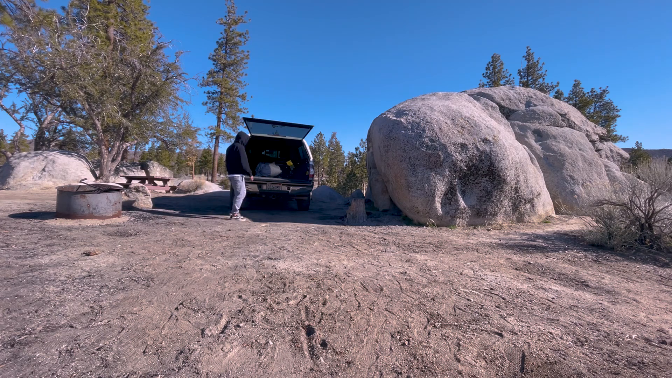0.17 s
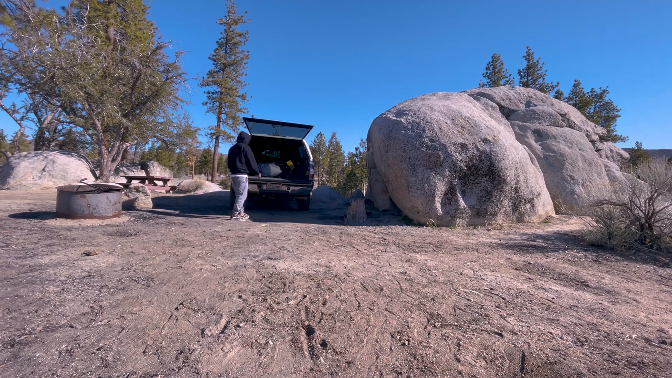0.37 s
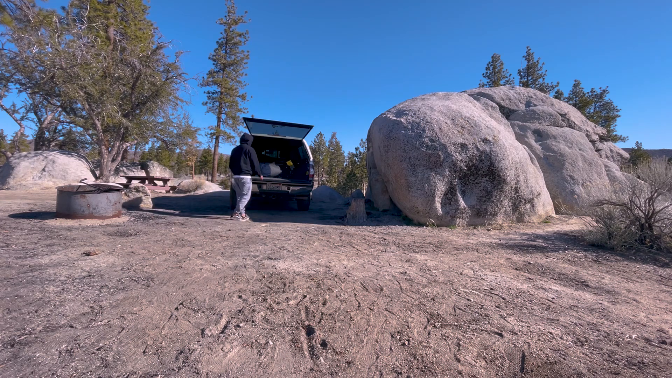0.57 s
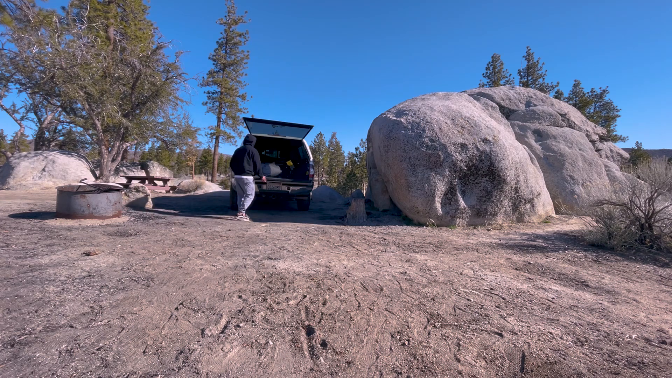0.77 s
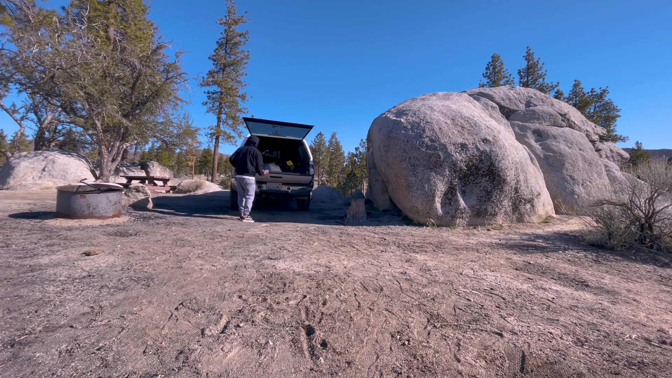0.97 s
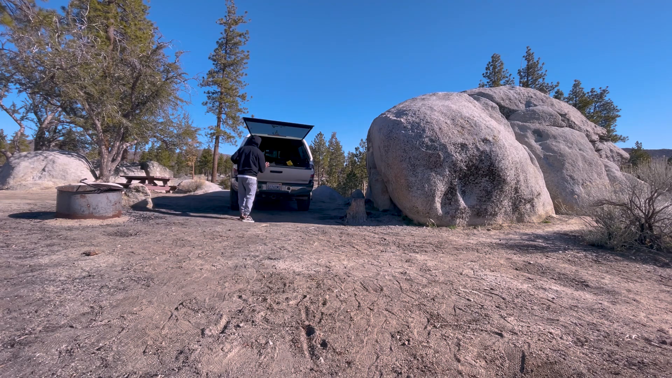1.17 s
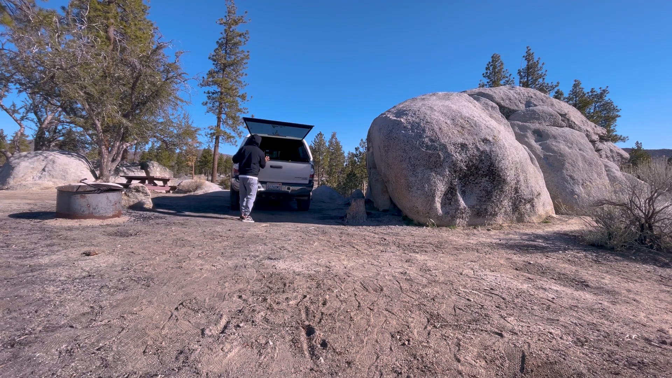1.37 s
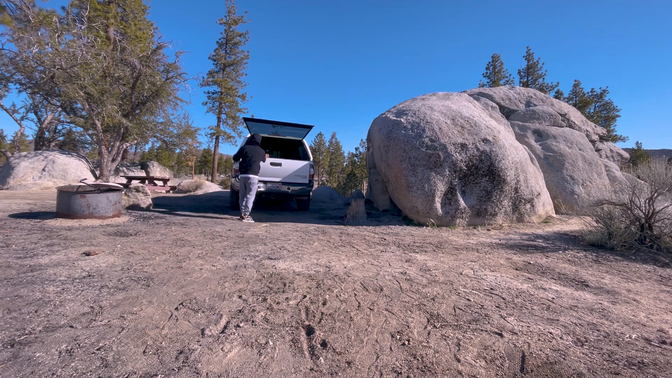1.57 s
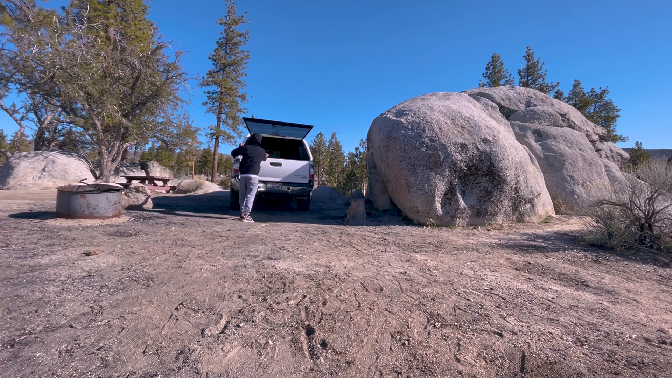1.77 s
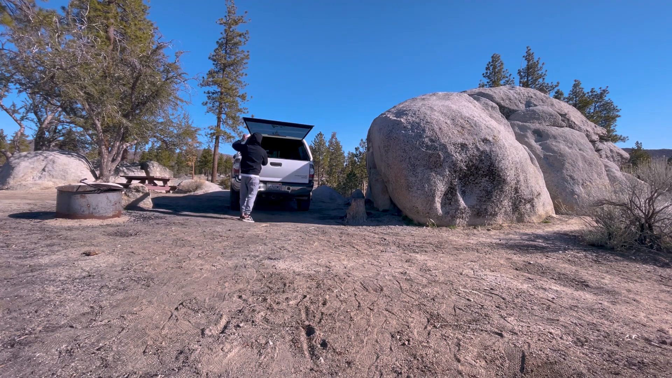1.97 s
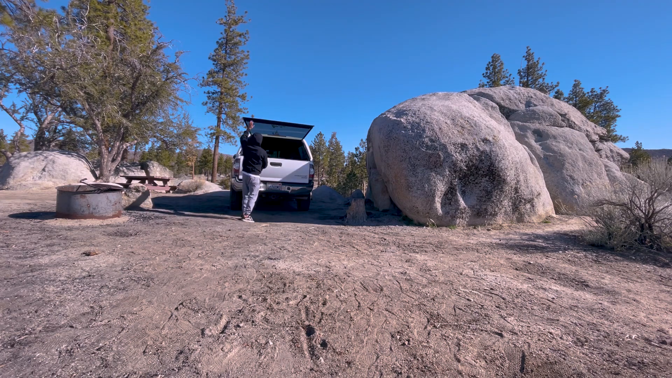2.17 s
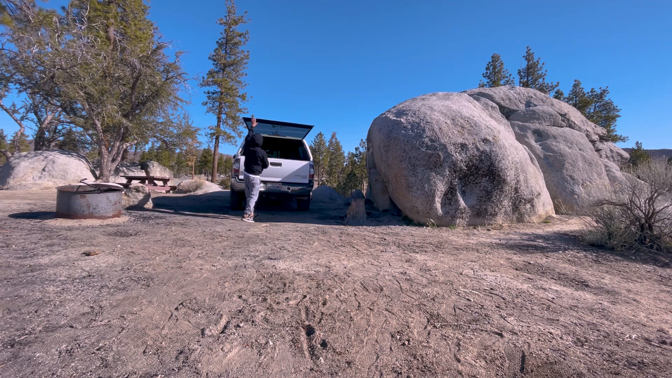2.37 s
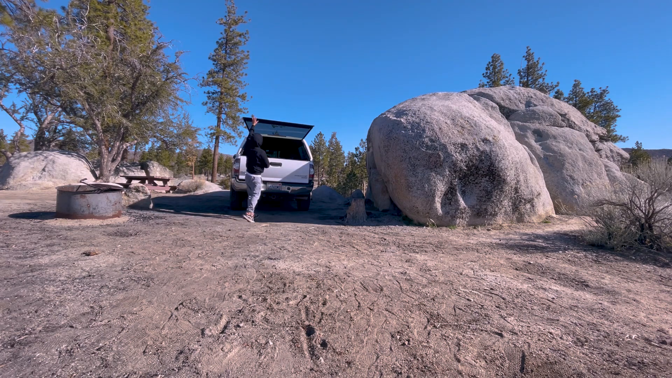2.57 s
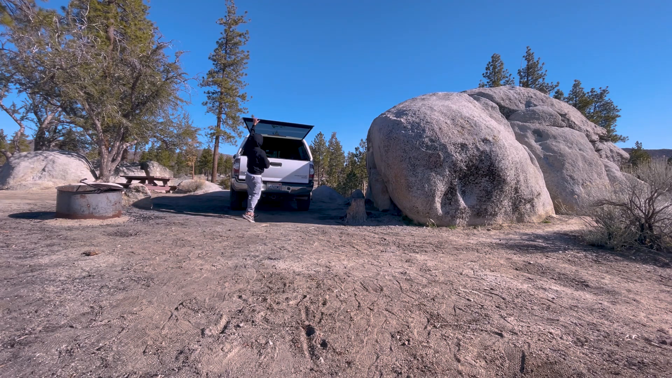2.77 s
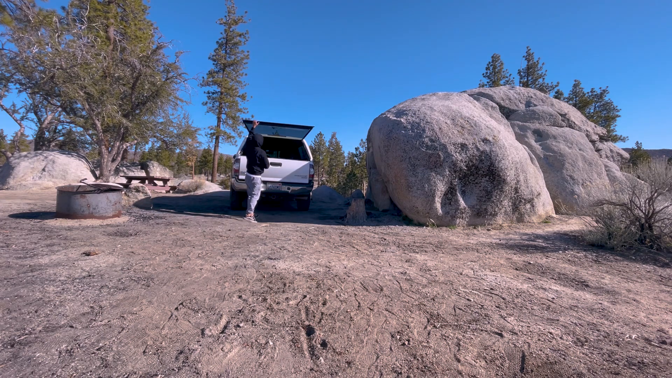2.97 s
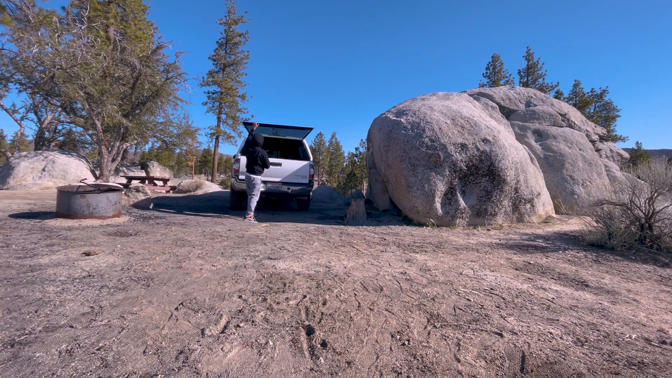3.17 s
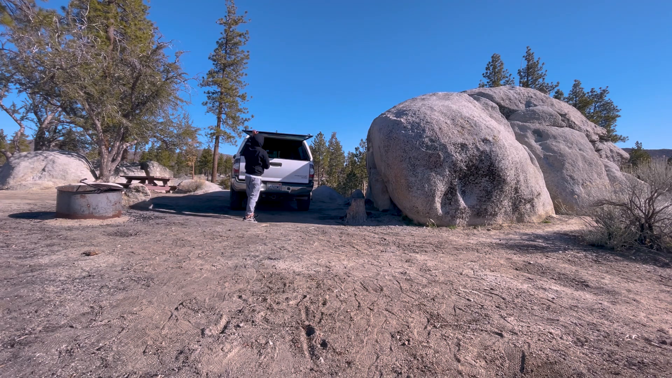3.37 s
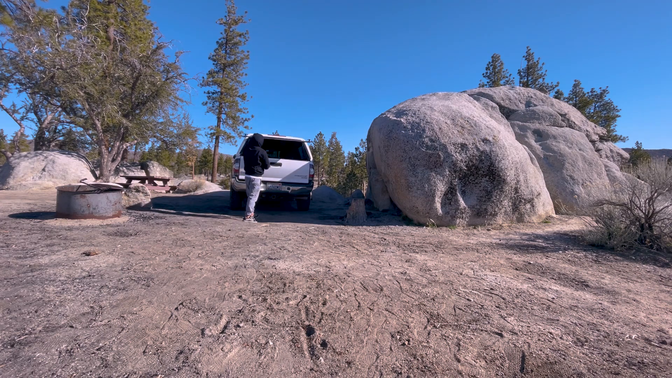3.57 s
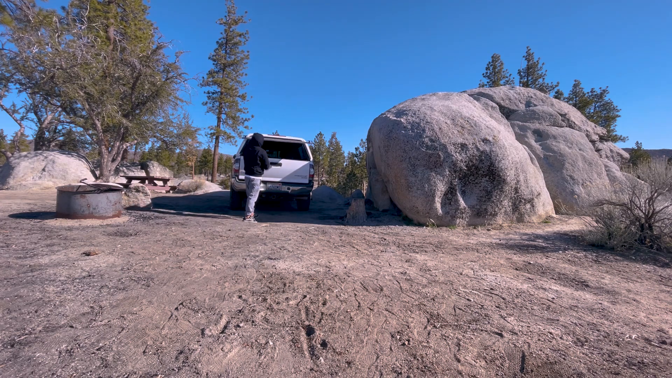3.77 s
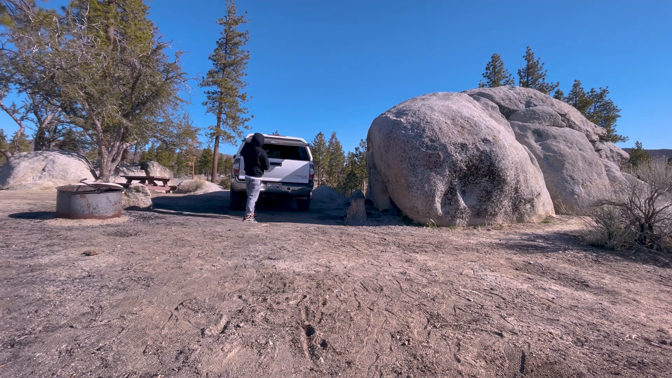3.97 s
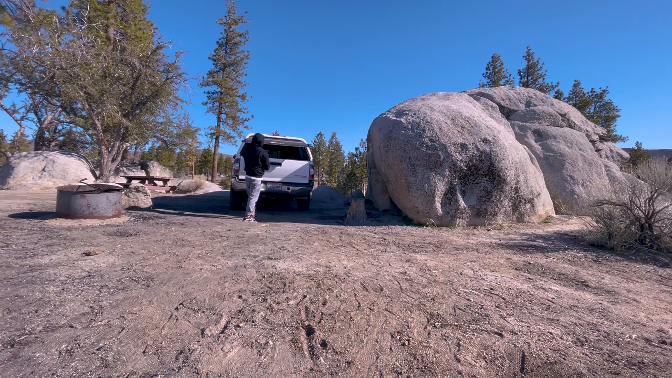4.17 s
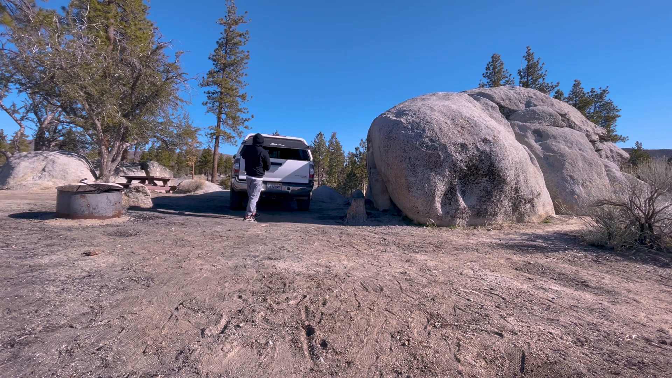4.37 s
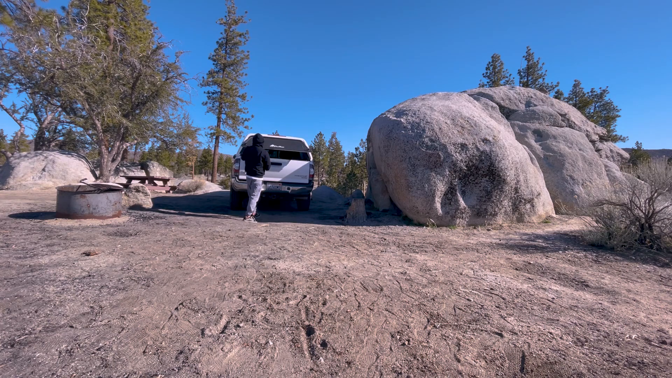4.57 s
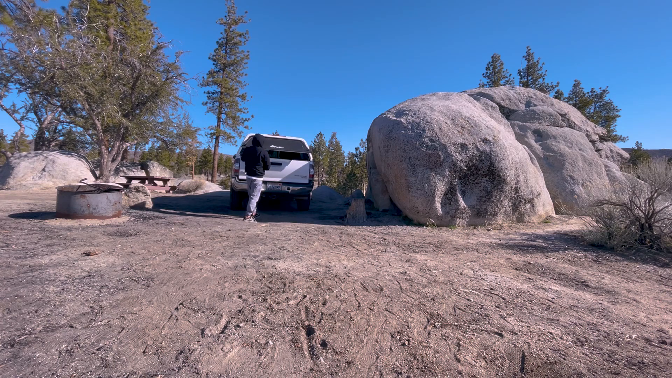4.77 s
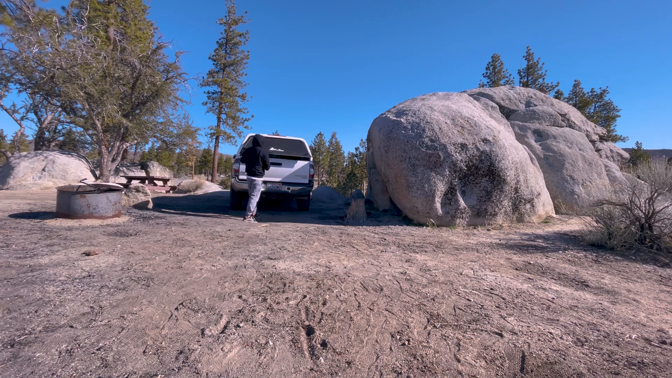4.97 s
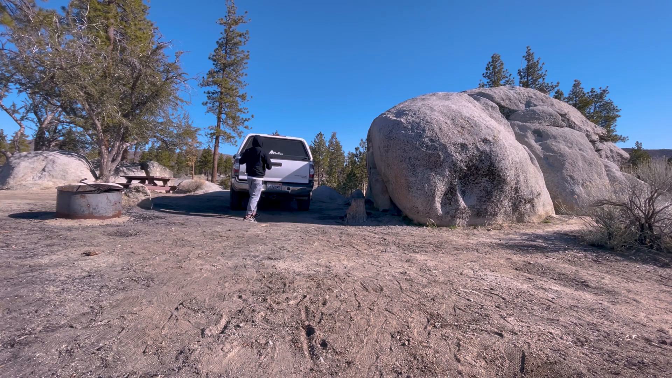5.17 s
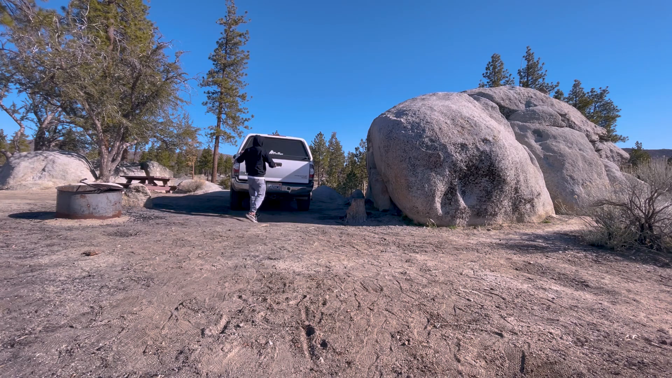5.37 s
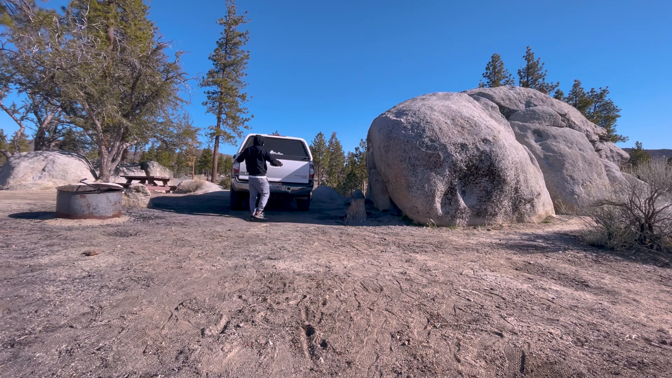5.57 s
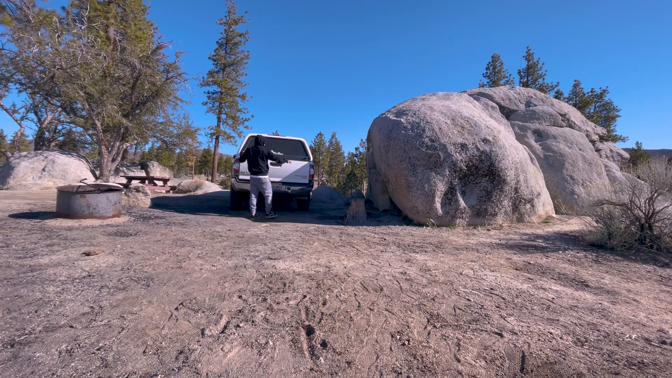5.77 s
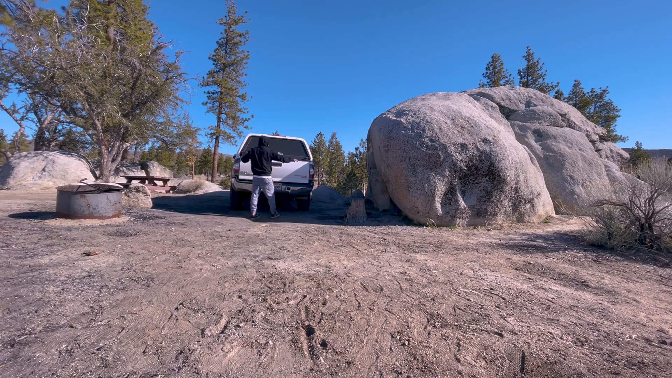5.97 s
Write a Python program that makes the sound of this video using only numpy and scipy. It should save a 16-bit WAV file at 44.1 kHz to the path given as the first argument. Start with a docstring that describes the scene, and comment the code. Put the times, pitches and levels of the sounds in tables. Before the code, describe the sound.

A quiet open campsite heard from a fixed, distant stereo microphone. Soft low outdoor air with faint hiss lies under a far engine's low, steady drone, gently wavering and sagging slightly in pitch throughout. Light sheet-metal knocks come at about 0.75 to 1.05 seconds as a truck's tailgate is lifted, the strongest near 0.9. At 1.6 a tight cluster of hard clanks latches it: a rattling metallic thunk with a short low body boom. From 2.3 to 3 there are only barely audible touches, dull low bumps and a tiny raspy bird chip at 2.85. The engine's dull rush swells near 3.8 and 4.6; very faint distant bird chatter begins around 4, with another chip at 4.57. At 5.1 the rear hatch slams, loudest of all: a sharp crack, hollow deep boom and brief scattered echoes, then a second latch snap at 5.2 and small settling ticks. The drone continues to 6.

```python
"""A pickup's tailgate, some way off at an open campsite, is lifted, rattles and latches with a thunk; then the
glass hatch of its shell is slammed and the closed load bed booms. Each blow is noise cracks, a dying wash and
sheet-metal modes over slow body modes, and a burst of noise echoes scatters it off boulders and trees.
A distant engine of sine overtones drones throughout with dull low noise, over soft outdoor air.
A small bird chips twice as rasping sine arches, and another chatters far off in bursts of noise."""
import sys
import numpy as np
from scipy import signal
from scipy.fft import rfft, irfft, next_fast_len
from scipy.io import wavfile
from scipy.ndimage import map_coordinates

SR = 44100
rng = np.random.default_rng(int(sys.argv[2]) if len(sys.argv) > 2 else 0)


def unload_audio(sound):
    """Save the sound as a 16-bit wav file, at the path given as the first command line argument."""
    columns = np.transpose(np.atleast_2d(sound))
    # keep every value between -1 and 1, then stretch to whole-number steps
    steps = np.round(np.clip(columns, -1, 1) * 32767)
    wavfile.write(sys.argv[1], SR, steps.astype(np.int16))


N = 265570
RING_SIZE = 2 * SR // 5  # samples in one blow's ring or echo tail
FAINTEST_DB = -68  # rebounds and grazes at or below this level are left out
EARS = np.array([[.5], [-.5]])  # left and right each take half of a difference


def amp(db):
    """Decibels to gain."""
    return 10 ** (np.asarray(db) / 20)


def unit(x):
    """Scale to rms 1."""
    return x / np.sqrt(np.mean(x ** 2) + 1e-20)


def along(points, hz):
    """Read (frequency, value) points on a log frequency axis."""
    f, v = np.transpose(points)
    return np.interp(np.log(hz + 1), np.log(f), v)


def wobble(rate, size=N):
    """A smooth random curve with rate knots a second."""
    knots = rng.standard_normal(int(size * rate / SR) + 4)
    return map_coordinates(knots, [np.arange(size) * rate / SR])


def filtered(x, response):
    """Shape x by a response given as a function of frequency."""
    n = x.shape[-1]
    padded = 2 * next_fast_len(n // 2 + SR // 20, real=True)
    spectrum = rfft(x, padded) * response(np.fft.rfftfreq(padded, 1 / SR))
    return irfft(spectrum, padded)[..., :n]


def causal(db):
    """Minimum-phase response of this shape and unit power, so a blow does not sound before its contact."""
    cepstrum = irfft(np.log(unit(amp(db)) + 1e-6))
    half = len(cepstrum) // 2
    cepstrum[1:half] *= 2
    cepstrum[half + 1:] = 0
    return np.exp(rfft(cepstrum))


def diffuse(n):
    """White stereo noise, more alike in the bass than in the treble."""
    # left-right likeness of diffuse sound: (frequency [Hz], correlation [0-1])
    likeness = [(60, 0.4), (130, 0.82), (290, 0.55), (640, 0.11), (1400, .2), (8000, 0.08)]

    def mid_side(hz):
        turn = np.arccos(np.clip(along(likeness, hz), -1, 1)) / 2
        return np.array([np.cos(turn), np.sin(turn)])

    mid, side = filtered(rng.standard_normal((2, n)), mid_side)
    return np.array([mid + side, mid - side])


def dying(length):
    """Diffuse noise in which each frequency dies at its own speed, as in shaken panels."""
    # decay of the panel wash, before the length factor: (frequency [Hz], t60 [s])
    wash_t60s = [(150, 0.74), (400, 0.29), (1200, 0.34), (3000, 0.22), (7000, .23), (14000, 0.12)]
    hz, t, cells = signal.stft(diffuse(RING_SIZE), SR, nperseg=256)
    t60 = length * along(wash_t60s, hz)[:, None]
    return signal.istft(cells * amp(-60 * t / t60), SR, nperseg=256)[1][:, :RING_SIZE]


def fade(t, t60):
    """Decay of 60 dB in t60 seconds."""
    return np.exp(-np.log(1000) * t / t60)


def add(track, s, sound):
    """Mix a sound into the track at a time in seconds."""
    part = track[..., max(round(s * SR), 0):][..., :sound.shape[-1]]
    part += sound[..., :part.shape[-1]]


def engine(tone_db, noise_db, right_db, lead_ms):
    """A far engine slowly runs down: overtones come and go together over dull low noise.
    It is louder on the right and lead_ms earlier on the left."""
    # level of the fundamental, before its wobble: (time [s], level [dB])
    hum = [(0, -46.5), (1.35, -46), (2.25, -41), (2.8, -42), (3.2, -45.5), (4.45, -40), (6, -42.5)]
    # overtones at their fullest, before their wobble: (multiple of the fundamental, level [dB])
    overtones = [(2, -55), (3, -58), (4, -71), (5, -77), (6, -91.5)]
    # spectrum of the dull low noise: (frequency [Hz], relative level [dB per Hz])
    noise_colour = [(30, -12.5), (70, 0), (130, 8), (220, -1), (350, -3), (450, -16.5), (600, -28),
                    (1000, -41), (2000, -70)]
    # course of the dull low noise, before noise_db and its flutter: exhaust rush, with a swell near 3.8 s
    # perhaps from the hatch's gas struts: (time [s], level [dB])
    noise_course = [(.5, -72), (1.4, -67.5), (3.2, -64), (3.78, -56.5), (4.15, -69), (4.6, -59),
                    (4.95, -65.5), (6, -65.5)]
    firing_hz, sag_hz_per_s = 84.92, .26
    open_s, open_db_per_s = 1.7, 15  # the overtones grow until then, at this rate
    hold_db_per_s = 1.3  # then ease off slowly
    close_s, close_db_per_s = 4.44, 3.5  # and from then on lose this much more

    t = np.arange(N) / SR
    pitch = firing_hz - sag_hz_per_s * t + 0.11 * wobble(8.8)
    phase = 2 * np.pi * np.cumsum(pitch) / SR
    dull_db = open_db_per_s * np.maximum(open_s - t, 0)
    dull_db += hold_db_per_s * np.maximum(t - open_s, 0)
    dull_db += close_db_per_s * np.maximum(t - close_s, 0)
    levels = [(1, np.interp(t, *np.transpose(hum)))]
    levels += [(round(k), db - dull_db) for k, db in overtones]
    tone = np.zeros(N)
    for k, db in levels:
        gain = amp(db + .25 * k * wobble(9.5))  # higher overtones waver more
        tone += gain * np.sin(k * phase + 2 * np.pi * rng.random())

    flutter_db = 1.298 * wobble(20)
    course_db = np.interp(t, *np.transpose(noise_course)) + flutter_db + noise_db
    low_noise = unit(filtered(diffuse(N), lambda hz: amp(along(noise_colour, hz)))) * amp(course_db)

    def placed(hz):
        return amp(-EARS * right_db) * np.exp(2j * np.pi * hz * EARS * lead_ms / 1000)

    return filtered(np.sqrt(2) * amp(tone_db) * tone + low_noise, placed)


def air(db, left_db):
    """A soft outdoor rumble under a faint hiss that leans to the left, both filtered noise."""
    # spectrum of the open air: (frequency [Hz], relative level [dB per Hz])
    spectrum = [(20, 13), (55, 29), (100, 25.5), (250, 7.5), (600, -3), (1000, -7.5), (1600, -8.5),
                (3000, -14), (5000, -15), (8600, -14), (10000, -26.5), (12500, -24), (16000, -36)]

    def colour(hz):
        lean_db = EARS * left_db * hz / (hz + 1500)
        return amp(along(spectrum, hz) + lean_db)

    return amp(db) * unit(filtered(diffuse(N), colour))


def grazes(blows, crack_db, length):
    """Soft knocks do not land at once: a light touch leads each in."""
    soft_below = -3  # hardness [dB per octave] under which a knock counts as soft
    lead_s, graze_db = 0.017, -12.5  # how much earlier and weaker the touch is
    return [(s - lead_s, db + graze_db, hardness, crack_db, length) for s, db, hardness, _ in blows
            if hardness < soft_below and db + graze_db > FAINTEST_DB]


def contacts(blows, crack_db, gap_s, rebound_db):
    """Each blow rebounds at most once, weaker and duller; the harder a contact, the more it cracks.
    rebound_db is the rebound of a 0 dB blow."""
    crack_per_hardness = 1.2  # dB more crack for each dB per octave of hardness
    rebound_dulling = 2.5  # dB per octave lost in a rebound
    rebound_db_per_db = 0.67  # seals swallow more of a heavy blow: the rebound grows less than the blow
    rows = []
    for s, db, hardness, length in blows:
        rows.append((s, db, hardness, crack_db + crack_per_hardness * hardness, length))
        back_s = s + gap_s * rng.uniform(.9, 1.1)
        back_db = rebound_db + rebound_db_per_db * db
        soft = hardness - rebound_dulling
        if back_db > FAINTEST_DB:
            rows.append((back_s, back_db, soft, crack_db + crack_per_hardness * soft, length))
    return rows


def settling(blows, first_db, gap_s, loss_db, hardness, crack_db, length, count):
    """After the heaviest blow loose parts tick on at uneven gaps, each tick weaker than the last."""
    slam_s = max(blows, key=lambda blow: blow[1])[0]
    times = slam_s + gap_s * (1 + np.arange(count) + rng.uniform(-.15, .15, count))
    return [(s, first_db - loss_db * k, hardness, crack_db, length) for k, s in enumerate(times)]


def ringing(modes, length, tilt):
    """Sheet-metal modes of about rms 1 at the start, at new strengths and phases for each blow."""
    t = np.arange(RING_SIZE) / SR
    hz, db, t60 = np.transpose(modes)
    life = np.minimum(length * t60, .3)  # seals and paint damp every mode within a third of a second
    strengths = unit(amp(db + tilt(hz) + rng.normal(0, 2.9, len(hz)))) * np.sqrt(2 / len(hz))
    swing = np.sin(2 * np.pi * (hz[:, None] * t + rng.random((len(hz), 1))))
    onset = 1 - np.exp(-t / 0.001013)
    return strengths @ (swing * fade(t, life[:, None])) * onset


def clatter(hits, colour, modes, modes_db, crack_t60, attack, rattle_db):
    """Each contact is a crack, a rattling wash of panel vibration and a few clear metal modes."""
    out, t = np.zeros((2, N)), np.arange(RING_SIZE) / SR
    for s, db, bright_db, crack_db, length in hits:
        length = max(length, .1)
        tilt = lambda f: bright_db * np.log2(np.maximum(f, 200) / 1000)  # a hard contact is brighter
        crack = amp(crack_db) * fade(t, crack_t60) * rng.standard_normal(RING_SIZE)
        rattle = unit(amp(rattle_db * wobble(600, size=RING_SIZE)))  # loose parts chatter as the panels shake
        wash = dying(length) * rattle * (1 - np.exp(-t / attack))
        blow = filtered(crack + wash, lambda f: causal(along(colour, f) + tilt(f)))
        ring = amp(modes_db) * ringing(modes, length, tilt)
        add(out, s, amp(db) * (blow + ring))
    return out


def boom(pushes, modes, attack, puff_db, puff_time):
    """A puff of displaced air, then slow modes; neighbours start in opposition, so the boom swells, then dies."""
    out, t = np.zeros(N), np.arange(SR) / SR
    u = t / puff_time
    puff = amp(puff_db) * u * (2 - u) * np.exp(-u)
    for s, db, corner_hz in pushes:
        swing = np.zeros(SR)
        for k, (hz, mode_db, t60) in enumerate(modes):
            # a soft push hardly excites modes above its corner
            strength = (-1) ** k * amp(mode_db) / np.hypot(1, (hz / corner_hz) ** 2)
            swing += strength * np.sin(2 * np.pi * hz * t) * fade(t, t60)
        add(out, s, amp(db) * (swing + puff) * (1 - np.exp(-t / attack)))
    return out


def tailgate():
    """The steel gate is lifted, swings up and catches in its latch: clattering sheet metal over a body boom."""
    # blows, from handling knocks to the latch and the thunk:
    # (time [s], level [dB], hardness [dB per octave], ring length [factor])
    blows = [(.036, -61, -3.5, 0.43), (.757, -47, -4, 0.79), (.854, -42, -2.5, 0.57),
             (.893, -37.5, 0.5, 0.46), (1.024, -48, -8, 0.83), (1.072, -56, -5.5, 0.36),
             (1.395, -59, -12.5, 1.3), (1.472, -49.5, -4.5, 0.87), (1.545, -52, -5, 2.8),
             (1.575, -36, 3.5, 0.9), (1.595, -28, 3.5, 0.89), (1.609, -32.5, -3.5, 0.99),
             (1.627, -27.5, -4.5, 0.84), (2.332, -61, -1, 0.61), (2.82, -67, -6.5, .8),
             (4.332, -73, -1, 0.56)]
    # spectrum of the dense clatter: (frequency [Hz], relative level [dB per Hz])
    colour = [(60, -22), (130, 1), (200, -6.5), (300, -4), (420, 0), (750, -4.5), (1200, -2.5), (2200, -3),
              (3300, -11.5), (5000, -16.5), (6500, -14), (8000, -21), (13500, -21.5), (16000, -29.5)]
    # sheet-metal modes, before each blow's variation: (frequency [Hz], relative level [dB], t60 [s])
    modes = [(291, -6, 0.13), (386.7, 1.5, 0.22), (437, -1, 0.16), (547, -3.5, 0.218), (605, -4, .22),
             (851, -4.5, 0.23), (1170, -9, 0.076), (1430, -7, 0.19)]
    # strikes on the latch: (time [s], level [dB])
    latch_hits = [(.893, -45), (1.575, -33.5), (1.595, -37)]
    # latch modes, before each strike's variation: (frequency [Hz], relative level [dB], t60 [s])
    latch_modes = [(1998, -1, 0.13), (2020, 3.5, .15), (2164, 1, 0.17), (2350, -4, 0.097),
                   (3090, -6.5, .12), (5960, -15.5, 0.11), (6240, -11, 0.17)]
    # pushes on the truck's body: (time [s], level [dB], corner, lower is softer [Hz])
    pushes = [(.756, -39.5, 300), (1.02, -42.5, 250), (1.11, -37, 65), (1.619, -21.5, 202.5),
              (2.845, -37, 60), (2.98, -40.5, 59.6)]
    # slow modes of the bed's air and the big panels: (frequency [Hz], relative level [dB], t60 [s])
    body = [(44.6, -16, 0.42), (51, -6, 0.77), (93.7, -1.5, 0.35), (116.5, -3, 0.52), (161.4, -3.5, 0.42),
            (205.5, -4, 0.29)]

    hits = grazes(blows, crack_db=-15, length=.7)
    hits += contacts(blows, crack_db=-2.5, gap_s=.028, rebound_db=-24.0)
    hits += settling(blows, first_db=-47, gap_s=.064, loss_db=4.0, hardness=-3.5, crack_db=-2,
                     length=0.57, count=2)
    metal = clatter(hits, colour, modes, modes_db=-5.5, crack_t60=0.013, attack=0.0015, rattle_db=1.5)
    for s, db in latch_hits:
        add(metal, s, amp(db) * ringing(latch_modes, 0.89, np.zeros_like))  # no brightness tilt
    return metal + boom(pushes, body, attack=0.0077, puff_db=-7.0, puff_time=0.0074)


def bird(length, pitch_hz, rasp_hz):
    """Short chips from the trees: sine arches made raspy by fast random pitch."""
    # chips: (time [s], level [dB])
    chips = [(2.848, -71), (4.566, -73.5)]
    out, u = np.zeros(N), np.linspace(0, 1, round(length * SR))
    for s, db in chips:
        pitch = pitch_hz + rasp_hz * wobble(620)[:len(u)]
        arch = np.sin(np.pi * u)
        add(out, s, amp(db) * arch * np.sin(2 * np.pi * np.cumsum(pitch) / SR))
    return out


def chatter(centre_hz, width_hz, note_s):
    """A very distant bird repeats one hoarse note of band noise evenly, slowly growing louder."""
    start_s, note_gap_s = 3.99, .0948  # the gap runs from note to note
    first_db, growth_db_per_s = -92, 3
    t = np.arange(N) / SR - start_s
    notes = np.sin(np.pi * np.minimum(t % note_gap_s / note_s, 1)) * (t > 0)
    rasp = unit(filtered(diffuse(N), lambda hz: np.exp(-((hz - centre_hz) / width_hz) ** 2)))
    return amp(first_db + growth_db_per_s * t) * notes * rasp


def hatch():
    """The hatch slams on the gate and its second latch snaps a moment later: sharp cracks over a bed boom."""
    # blows (first touch, latch, frame, second latch, a late tick):
    # (time [s], level [dB], hardness [dB per octave], ring length [factor])
    blows = [(5.081, -65, 0.5, 1), (5.1028, -25, .5, .35), (5.107, -24, -1, 0.81),
             (5.2055, -34.5, 0.5, 0.67), (5.503, -71.5, -1.5, 0.76)]
    # spectrum of the dense clatter: (frequency [Hz], relative level [dB per Hz])
    colour = [(80, -22.5), (200, 1), (330, 3), (450, -3), (650, -4.5), (850, -5.5), (1150, -7.5),
              (1500, -11.5), (2200, -9.5), (3200, -11), (4600, -13), (6000, -17), (12500, -22.5),
              (16000, -30.5)]
    # sheet-metal modes, before each blow's variation: (frequency [Hz], relative level [dB], t60 [s])
    modes = [(289, -1.5, 0.22), (428, -1, 0.3), (590, -1, 0.12), (716, -1, 0.1), (911, -2, 0.22),
             (980, -6.5, 0.13), (1195, -2, 0.19), (1790, -10, 0.2), (2054, -7.5, .19), (2320, -9, .22),
             (3170, -10, 0.08), (5900, -11.5, 0.19)]
    # pushes on the truck's body: (time [s], level [dB], corner, lower is softer [Hz])
    pushes = [(5.106, -13.5, 303), (5.203, -20.5, 200.4)]
    # slow modes of the bed's air and the big panels: (frequency [Hz], relative level [dB], t60 [s])
    body = [(46.8, -2.5, 0.47), (54.3, -1, 0.58), (100.64, -4.5, 0.55), (131.1, -1.5, 0.28), (157, -7, 0.3),
            (195, -13.5, 0.25), (348.6, -5.5, .14)]

    hits = contacts(blows, crack_db=11.5, gap_s=.018, rebound_db=-21)
    hits += settling(blows, first_db=-41.5, gap_s=.076, loss_db=8, hardness=-1.1, crack_db=6,
                     length=0.87, count=2)
    metal = clatter(hits, colour, modes, modes_db=-4.5, crack_t60=0.0054, attack=0.00053, rattle_db=2.0)
    return metal + boom(pushes, body, attack=0.00089, puff_db=-2.5, puff_time=.007)


def campsite(x, echo_db, spread, lead_ms):
    """The truck stands to the left; rocks and trees return a scatter that ends soon, with open land beyond."""
    # what boulders and trees reflect: (frequency [Hz], level [dB])
    scatter = [(100, 1), (500, -0.5), (2000, -2.5), (10000, 0)]
    # the truck's lean to the left: (frequency [Hz], left over right [dB])
    lean = [(100, 0.3), (200, 0.5), (350, 3), (1000, 3.5), (2000, 0.5), (4000, 3.5), (8000, 1)]
    t = np.arange(RING_SIZE) / SR
    tail = filtered(diffuse(RING_SIZE), lambda hz: amp(along(scatter, hz)))
    tail = tail * t * np.exp(-(t / spread) ** 2)
    echo = signal.fftconvolve(x, tail / np.linalg.norm(tail[0]), axes=1)[:, :N]
    echo = filtered(echo, lambda hz: hz / np.hypot(hz, 150))  # long waves bend round the rocks

    def placed(hz):
        return amp(EARS * along(lean, hz)) * np.exp(2j * np.pi * hz * EARS * lead_ms / 1000)

    return filtered(x + amp(echo_db) * echo, placed)


def scene():
    """The truck in its surroundings."""
    truck = campsite(tailgate() + hatch(), echo_db=-17.0, spread=.055, lead_ms=.11)
    drone = engine(tone_db=0.0, noise_db=1.5, right_db=1.5, lead_ms=0.58)
    birds = bird(length=0.026, pitch_hz=5100, rasp_hz=300)
    birds = birds + chatter(centre_hz=2750, width_hz=650, note_s=0.048)
    return truck + drone + birds + air(db=-63.5, left_db=8.0)


def record(dry):
    """Stereo is widened over most of the band, nearly mono at the top, with little above 16 kHz."""
    # stereo width by frequency: (frequency [Hz], side gain [dB])
    width = [(300, 2), (1200, 2), (4000, 1), (9000, 2), (12000, -3), (14000, -22.5)]
    top_hz = 15900
    mid = (dry[0] + dry[1]) / 2
    side = filtered((dry[0] - dry[1]) / 2, lambda hz: amp(along(width, hz)))
    pair = np.array([mid + side, mid - side])
    return filtered(pair, lambda hz: 1 / np.hypot(1, (hz / top_hz) ** 60))


dry = scene()
out = record(dry)
unload_audio(out)
```